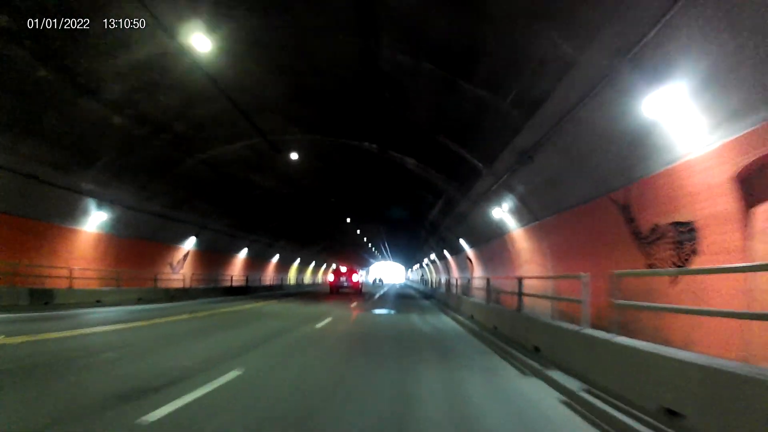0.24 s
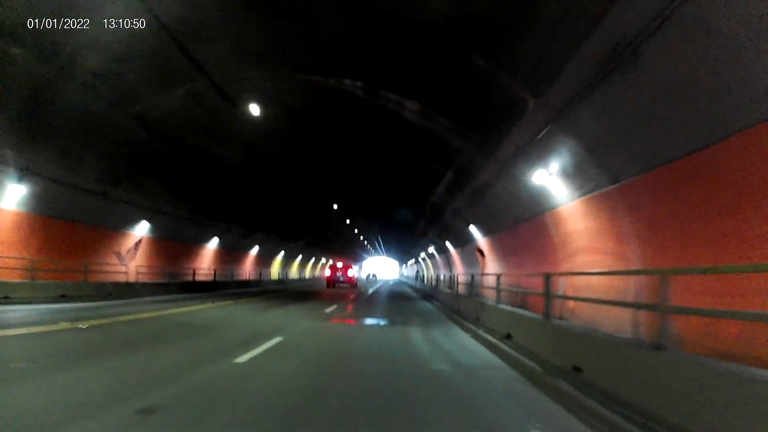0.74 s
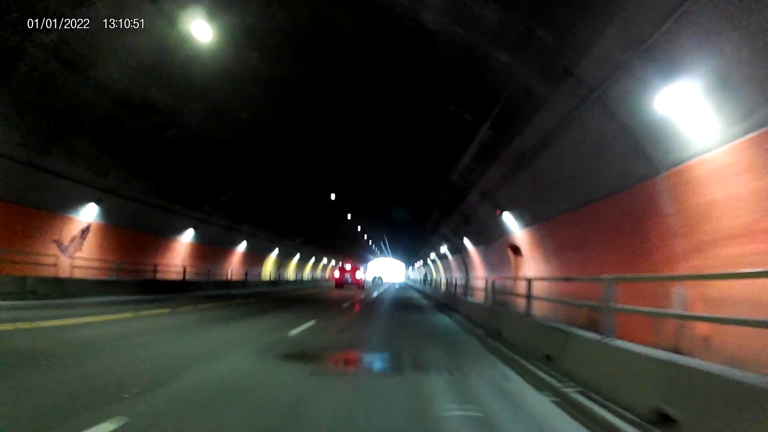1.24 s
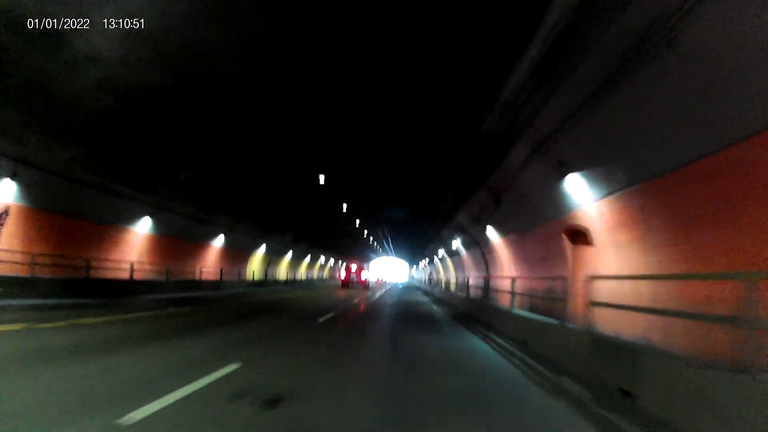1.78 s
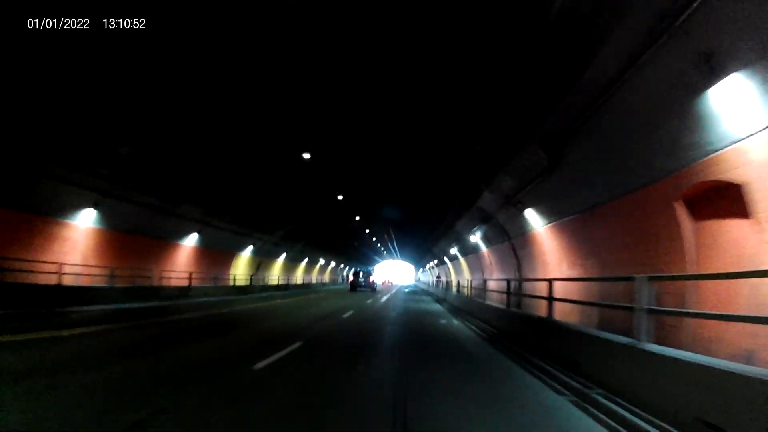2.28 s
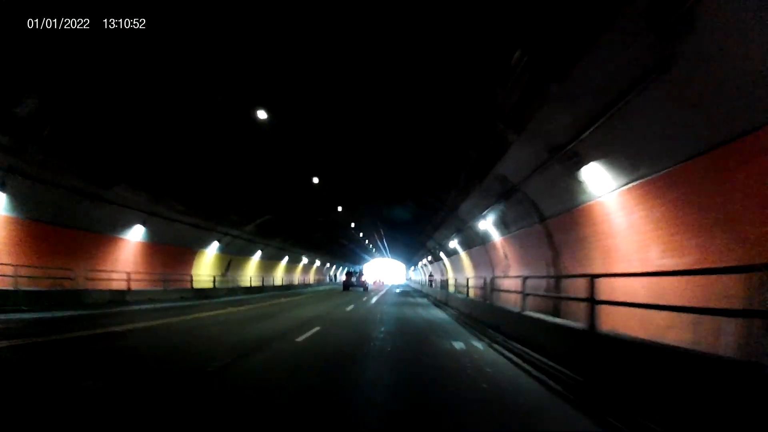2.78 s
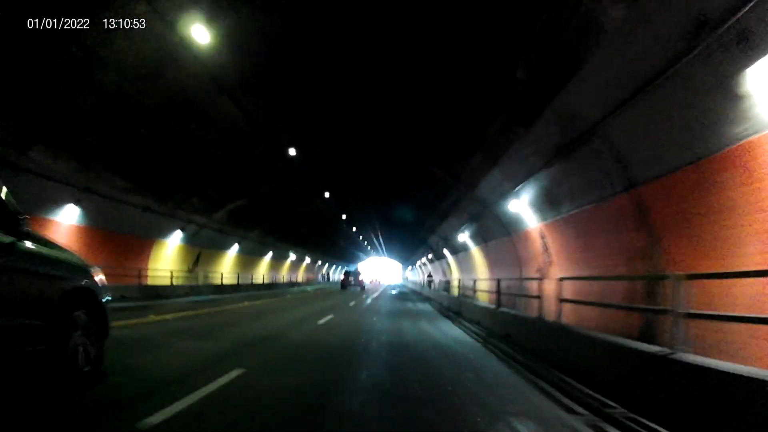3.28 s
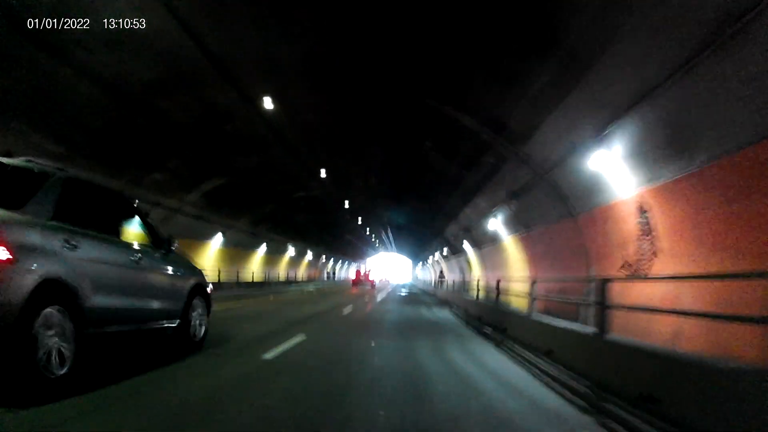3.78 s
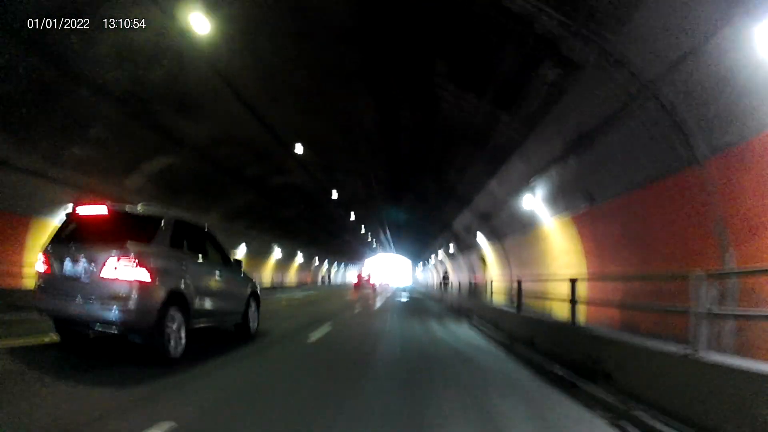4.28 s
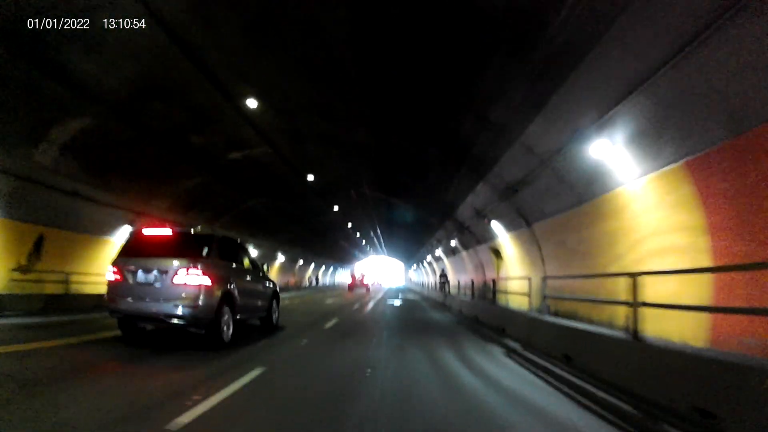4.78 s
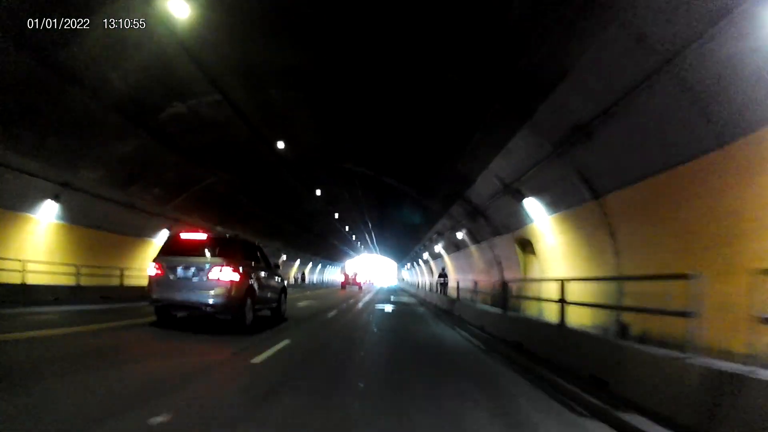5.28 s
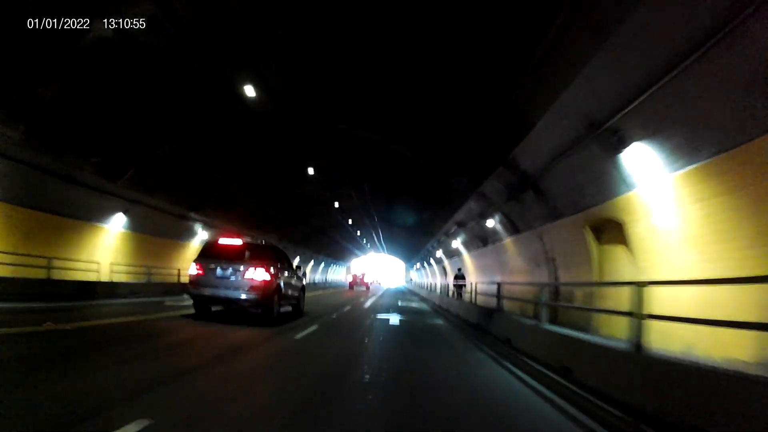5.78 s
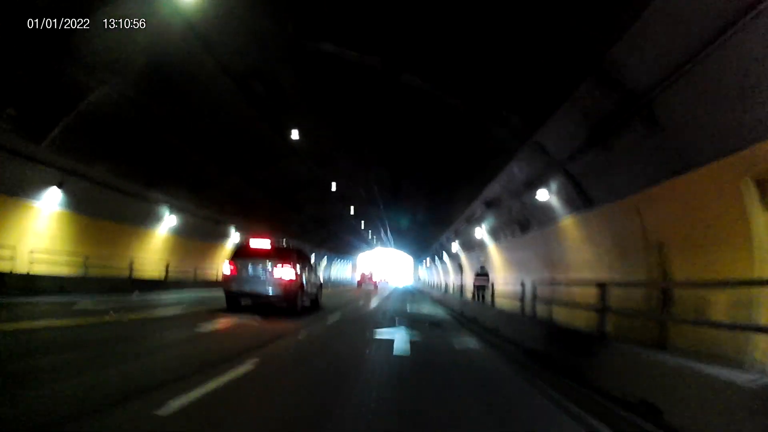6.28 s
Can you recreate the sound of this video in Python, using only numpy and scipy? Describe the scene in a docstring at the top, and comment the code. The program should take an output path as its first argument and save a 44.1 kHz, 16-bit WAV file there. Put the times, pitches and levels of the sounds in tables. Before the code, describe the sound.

Cars roar steadily through a road tunnel, heard from a bicycle with buffeting headwind, low road vibration and irregular plastic ticking.

```python
"""Cycling through a road tunnel

One camera microphone on a moving bicycle. Farther off, tyres and engines merge into an echoing roar.
Headwind rumbles right on the microphone, and one strong eddy thumps it about halfway through.
Close up, the road shakes the camera mount at its own low resonance, and the loose plastic housing
chafes, ticks at the ends of the swing and knocks at bumps."""
import sys
import numpy as np
from scipy import signal
from scipy.fft import rfft, irfft
from scipy.io import wavfile
from scipy.ndimage import uniform_filter1d, map_coordinates

SR = 44100
rng = np.random.default_rng(int(sys.argv[2]) if len(sys.argv) > 2 else 0)


def transcribe(u):
    """Save the signal u as a 16-bit wav file named by the first command-line argument.

    u: samples, shape (n,) or (channels, n), limited to [-1, 1]; the rate is SR.
    q: integer samples, one column per channel.
    """
    v = np.clip(np.atleast_2d(u).T, -1, 1)
    q = np.round(v * 32767).astype(np.int16)
    wavfile.write(sys.argv[1], SR, q)


N = 288414
TIME = np.arange(N) / SR
MOUNT_HZ = 45.85  # the mount's own resonance

# Table levels are relative; each source sets its own gain.
# roar of the traffic down the tunnel: (time [s], level [dB])
ROAR_LEVEL = [(0, -25), (1.4, -24.5), (2.7, -25), (4.7, -24.5), (5.75, -25.5), (6.54, -25)]
# its colour: (frequency [Hz], level [dB])
ROAR_COLOUR = [(60, -1.5), (200, -8.5), (410, -1), (520, 0), (850, -4.5), (1050, -3.5), (1250, -6.5),
               (1600, -10), (2000, -18.5), (2500, -24), (3300, -32.5), (4100, -30.5), (4500, -45.5),
               (6000, -58)]
# hollow note of the cars' tyre treads: (time [s], level [dB])
TREAD_LEVEL = [(0, -24), (1.05, -24.2), (1.35, -20.5), (1.8, -21.5), (2.1, -22.5), (2.6, -22), (3.25, -23),
               (3.7, -24.5), (4.5, -24), (6.54, -24.5)]
# its colour: (frequency [Hz], level [dB])
TREAD_COLOUR = [(400, -30.5), (650, -8), (800, -3), (930, -5), (1150, -20), (2000, -50), (5000, -87.5)]
# headwind on the microphone, picking up and then steady: (time [s], level [dB])
WIND_LEVEL = [(0, -19), (.4, -18.5), (.65, -16.5), (6.54, -17)]
# its colour: (frequency [Hz], level [dB])
WIND_COLOUR = [(8, -23.5), (20, -9.5), (60, -6.5), (85, -4.5), (130, -0.5), (200, 0), (300, -3),
               (420, -6.5), (520, -21), (1000, -33), (3000, -75)]
# gusts and slack moments: (time [s], level change [dB])
WIND_GUSTS = [(.95, 1), (2.85, 2), (3.4, -1.5), (3.82, 0), (4.049, 1), (4.42, -1), (5.22, 1.5), (5.7, -0.5),
              (6.5, 0.5)]
# rough asphalt under the bicycle: (start [s], length [s], swing [dB], chatter [dB])
ROUGH_PATCHES = [(0, 0.2, -26, -33), (0.476, 0.26, -22, -29), (0.733, 0.11, -26, -37.5),
                 (1.06, 0.26, -33, -35), (1.438, 0.19, -20, -33), (1.775, 0.12, -32, -33.5),
                 (2.032, 0.12, -28, -36), (2.27, 0.15, -34, -41), (2.432, 0.13, -23, -29.5),
                 (2.578, 0.029, -35, -34), (2.961, 0.27, -25, -37), (3.515, 0.37, -28, -38),
                 (3.872, 0.2, -24, -32.5), (4.288, 0.23, -19, -28), (4.703, 0.31, -22.5, -39),
                 (5.068, 0.23, -39, -33.5), (5.863, 0.35, -38, -36), (6.255, 0.22, -23.5, -36)]
# very smooth asphalt that quiets the housing, only where end follows start: (start [s], end [s])
SMOOTH_STRETCHES = [(.215, 0.37), (.96, 0.81), (1.67, 2), (2.179, 2.2), (5.29, 5.38), (5.56, 5.4),
                    (5.75, 6.4)]
# road rumble through the frame: (frequency [Hz], level [dB])
ROAD_COLOUR = [(8, -32.5), (20, -4.5), (45, -1.5), (70, 1.5), (100, -2), (160, -15), (600, -65.5)]
# the housing chafing in its seat: (frequency [Hz], level [dB])
CHAFE_COLOUR = [(2500, -30.5), (3600, -10), (4080, 3), (4450, -6), (5350, -5), (5900, -24), (7000, -23.5),
                (8000, -37.5), (15000, -41)]
# ring of the plastic housing: (frequency [Hz], level [dB])
RING_COLOUR = [(300, -30), (1800, -6), (2500, -11.5), (3300, -25), (3570, -13), (3870, 3), (4085, 6),
               (4270, -3.5), (4650, -9.5), (4950, -15.5), (5450, -13.5), (5900, -38.5), (6900, -32),
               (8000, -52), (9000, -56.5)]
# knocks of the housing at bumps in the road: (time [s], peak level [dB])
BUMPS = [(0.0268, -21), (0.0580, -27), (0.1023, -24), (0.148, -30), (0.1767, -30), (0.4003, -21.5),
         (0.4292, -31), (0.5545, -14.5), (0.584, -27), (0.618, -22.5), (0.6275, -26), (0.6626, -29),
         (0.7029, -28), (0.7238, -29), (0.7698, -29), (0.7924, -15.5), (0.875, -28.5), (0.935, -26),
         (1.087, -24), (1.1245, -27), (1.3393, -28), (1.41, -21.5), (1.4764, -20), (1.5077, -28),
         (1.5297, -27), (1.5408, -20.5), (1.573, -26.5), (1.7618, -21.5), (1.998, -29), (2.047, -20.5),
         (2.0775, -34), (2.1087, -21.5), (2.3233, -28.5), (2.4156, -28), (2.463, -25), (2.478, -16.5),
         (2.4965, -27), (2.5411, -25), (2.5537, -26), (2.727, -30.5), (2.859, -30.5), (2.9414, -29.5),
         (2.9780, -27.5), (3.056, -30.5), (3.0896, -21), (3.3, -25.5), (3.3380, -16), (3.4066, -24.5),
         (3.5187, -32), (3.56, -20.5), (3.58, -29.5), (3.6612, -26.5), (3.6758, -17), (3.7444, -21),
         (3.849, -31), (3.878, -23.5), (3.9075, -21), (3.995, -23.5), (4.138, -29), (4.2125, -27),
         (4.2996, -24.5), (4.3136, -26), (4.3453, -27), (4.3568, -19), (4.3914, -25), (4.4114, -26),
         (4.4331, -20.5), (4.456, -24), (4.4897, -28), (4.535, -25.5), (4.5658, -35), (4.6206, -29.5),
         (4.6856, -17), (4.7122, -24.5), (4.7328, -26), (4.7643, -25), (4.881, -24.5), (4.9297, -28.5),
         (4.975, -24.5), (5.0088, -22), (5.092, -25), (5.0992, -25), (5.1527, -22), (5.1825, -30),
         (5.273, -23.5), (5.4089, -25.5), (5.5278, -25.5), (5.6683, -27), (5.6970, -27.5), (5.728, -25.5),
         (5.8865, -27), (5.9131, -26), (5.9457, -22), (6.0097, -26.5), (6.0288, -24), (6.0954, -27.5),
         (6.2450, -15), (6.2582, -28), (6.2944, -22), (6.3345, -24.5), (6.4066, -29.5), (6.499, -24)]
# the microphone's own hiss: (frequency [Hz], level [dB])
HISS_COLOUR = [(1000, 24.5), (8000, -14), (15500, -13.5)]


def gain_of(db):
    """Decibels to a factor."""
    return 10 ** (np.asarray(db) / 20)


def unit_rms(x):
    """Scales to an rms of one."""
    return x / np.sqrt(np.mean(x ** 2) + 1e-20)


def follow(curve):
    """A curve's value at every sample."""
    return np.interp(TIME, *np.transpose(curve))


def noise(colour):
    """Steady noise of the given colour."""
    hz, db = np.transpose(colour)
    bins_db = np.interp(np.log(np.fft.rfftfreq(N, 1 / SR) + 1), np.log(hz), db)
    return unit_rms(irfft(rfft(rng.standard_normal(N)) * gain_of(bins_db), N))


def wander(rate_hz):
    """Smooth random drift that changes up to about rate_hz times a second."""
    lowpass = np.exp(-(np.fft.rfftfreq(N, 1 / SR) / rate_hz) ** 2)
    return unit_rms(irfft(rfft(rng.standard_normal(N)) * lowpass, N))


def traffic_roar(level_db=4.0, flutter_db=0.92):
    """Tyres and engines farther off, smeared by the tunnel walls into an even roar."""
    return gain_of(level_db + follow(ROAR_LEVEL) + flutter_db * wander(23)) * noise(ROAR_COLOUR)


def tyre_treads(level_db=-4, swell=1.4):
    """Tread noise swells and fades as the cars shift along the tunnel."""
    db = follow(TREAD_LEVEL)
    return gain_of(level_db + db.mean() + swell * (db - db.mean())) * noise(TREAD_COLOUR)


def headwind(level_db=-2.5, eddy_db=0.7, gust_half_s=0.09):
    """Eddies press right on the microphone, harder in the gusts."""
    gust_db = sum(db * np.exp(-((TIME - s) / gust_half_s) ** 2) for s, db in WIND_GUSTS)
    return gain_of(level_db + follow(WIND_LEVEL) + gust_db + eddy_db * wander(37)) * noise(WIND_COLOUR)


def over_patches(between_db, peaks_db, rise_s=0.012, fade_s=0.016):
    """A level in dB that rests at between_db, builds on each rough patch and dies away after it."""
    amplitude = gain_of(between_db)
    for (start, length, *_), db in zip(ROUGH_PATCHES, peaks_db):
        rise = np.clip((TIME - start) / rise_s, 0, 1)
        fade = np.exp(-np.maximum(TIME - start - length, 0) / fade_s)
        amplitude = np.hypot(amplitude, gain_of(db) * rise * fade)
    return 20 * np.log10(amplitude)


def shaking(rest_swing_db=-33.5, rest_chatter_db=-37.5, lull_db=-14.5):
    """The mount's swing and the housing's chatter in dB: a little all the time, more on rough asphalt."""
    _, _, swings_db, chatters_db = np.transpose(ROUGH_PATCHES)
    uneven_db = wander(8.5)
    on_smooth = sum(1. * ((TIME > start) & (TIME < end)) for start, end in SMOOTH_STRETCHES)
    lull = uniform_filter1d(on_smooth, size=800)
    swing_db = over_patches(rest_swing_db + uneven_db, swings_db)
    chatter_db = over_patches(rest_chatter_db + lull_db * lull + uneven_db, chatters_db)
    return swing_db, chatter_db


def road_rumble(swing_db, level_db=-30.5, growth=0.1, usual_db=-28):
    """The asphalt that swings the mount also rumbles up through the frame to the microphone."""
    return gain_of(level_db + growth * (swing_db - usual_db)) * noise(ROAD_COLOUR)


def mount_throb(swing_db, cycles, level_db=-2.0, growth=0.97, wide_db=-23):
    """The camera nods on its mount: a low, nearly pure throb that stands out when the swing is wide."""
    throb_db = level_db + wide_db + growth * (swing_db - wide_db)
    return gain_of(throb_db) * np.sqrt(2) * np.sin(2 * np.pi * cycles)


def housing_chafe(chatter_db, level_db=-26, knock_db=-25.0, hiss_s=0.013, grain_db=4):
    """Close up, the housing chafes as it chatters; a brief scratchy hiss surrounds each knock."""
    knock_hiss = sum(gain_of(db) * np.exp(-abs(TIME - s) / hiss_s) for s, db in BUMPS)
    envelope = np.hypot(gain_of(level_db + chatter_db), gain_of(knock_db) * knock_hiss)
    grain = unit_rms(gain_of(grain_db * wander(300)))
    return envelope * grain * noise(CHAFE_COLOUR)


def housing_ring(tilt_db, size=1024):
    """The housing's short ring, peak one, tilted by tilt_db an octave above its main resonance."""
    hz, db = np.transpose(RING_COLOUR)
    bins_hz = np.fft.rfftfreq(size, 1 / SR) + 1
    octaves_above = np.log2(np.maximum(bins_hz / hz[db.argmax()], 1))
    bins_db = np.interp(np.log(bins_hz), np.log(hz), db) + tilt_db * octaves_above
    # a resonance rings only after the blow: minimum phase
    cepstrum = irfft(np.log(gain_of(bins_db)))
    cepstrum[1:size // 2] *= 2
    cepstrum[size // 2 + 1:] = 0
    ring = irfft(np.exp(rfft(cepstrum)))
    return ring / abs(ring).max()


def housing_ticks(times, levels_db, contact_s, scrape, hard_db=-19, dulling=1.76, detune=0.0076):
    """Brief, slightly scraping blows ring the housing; the softer the blow, the rounder its tick."""
    ticks = np.zeros(N)
    window = signal.windows.hann(max(int(contact_s * SR), 5))
    for s, db in zip(times, levels_db):
        contact = scrape * unit_rms(window * rng.standard_normal(len(window))) / np.sqrt(len(window))
        contact[len(window) // 2] += 1  # the blow itself
        tilt_db = dulling * np.clip(db - hard_db, -20, 0)
        tick = np.convolve(contact, housing_ring(tilt_db))
        pitch = 1 + detune * rng.standard_normal()  # no two ring quite alike
        tick = map_coordinates(tick, [np.arange(len(tick)) * pitch])
        start = max(round((s - contact_s / 2) * SR), 0)
        span = ticks[start:start + len(tick)]
        span += gain_of(db) * tick[:len(span)] / abs(tick).max()
    return ticks


def housing_rattle(chatter_db, cycles, level_db=1.1, scatter_db=3.0, slop_s=0.0015,
                   free_play_db=-38, onset_db=3.5, hardest_db=-26):
    """The housing taps its stop at the ends of a swing: now and then, or buzzing past its free play."""
    ends = np.flatnonzero(np.diff(np.floor(2 * cycles)))
    force, lateness = rng.standard_normal((len(ends), 2)).T
    times = ends / SR + lateness * slop_s
    tap_db = np.minimum(level_db + chatter_db[ends] + scatter_db * force, hardest_db)
    tap_chance = 1 / (1 + np.exp((free_play_db - chatter_db[ends]) / onset_db))
    # a hard knock takes the place of the tap in its half swing
    to_knock_s = abs(times[:, None] - np.transpose(BUMPS)[0]).min(1)
    touches = (to_knock_s > .3 / MOUNT_HZ) & (rng.random(len(ends)) < tap_chance)
    return housing_ticks(times[touches], tap_db[touches], contact_s=.0014, scrape=0.35)


def housing_knocks(level_db=2.0, graze_db=-13):
    """At a bump the housing grazes its stop, then hits it."""
    times, db = np.transpose(BUMPS)
    lead_s = rng.uniform(.0012, .0035, len(times))
    hits = housing_ticks(times, db + level_db, contact_s=0.0013, scrape=0.21)
    grazes = housing_ticks(times - lead_s, db + level_db + graze_db, contact_s=0.0018, scrape=0.44)
    return hits + grazes


def eddy_thump(at_s=3.5468, level_db=-5.0, width_s=0.001):
    """One strong eddy from a car alongside thumps the microphone: a suck, then a push."""
    offset = (TIME - at_s) / width_s
    return gain_of(level_db) * offset * np.exp((1 - offset ** 2) / 2)


def scene():
    """Heard from the bicycle, in mono: the shaking camera close up, wind, and the tunnel beyond."""
    swing_db, chatter_db = shaking()
    cycles = np.cumsum(MOUNT_HZ * (1 + .035 * wander(6.5))) / SR
    rumble = road_rumble(swing_db) + mount_throb(swing_db, cycles)
    housing = housing_rattle(chatter_db, cycles) + housing_knocks() + housing_chafe(chatter_db)
    tunnel = traffic_roar() + tyre_treads()
    wind = headwind() + eddy_thump()
    return (tunnel + wind + rumble + housing)[None]


def record(dry, hiss_db=-65, edge_hz=15720):
    """The camera's microphone adds faint hiss and loses the treble above edge_hz."""
    heard = dry + gain_of(hiss_db) * noise(HISS_COLOUR)
    lowpass = signal.firwin(511, edge_hz, window=("kaiser", 9), fs=SR)
    return signal.oaconvolve(heard, lowpass[None], "same")


dry = scene()
out = record(dry)
transcribe(out)
```